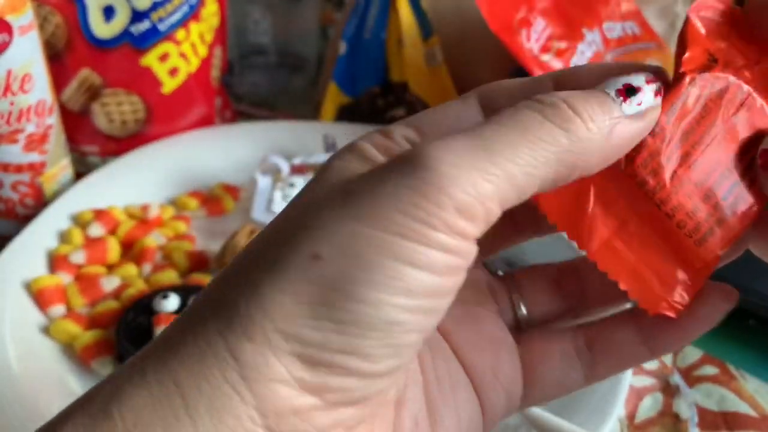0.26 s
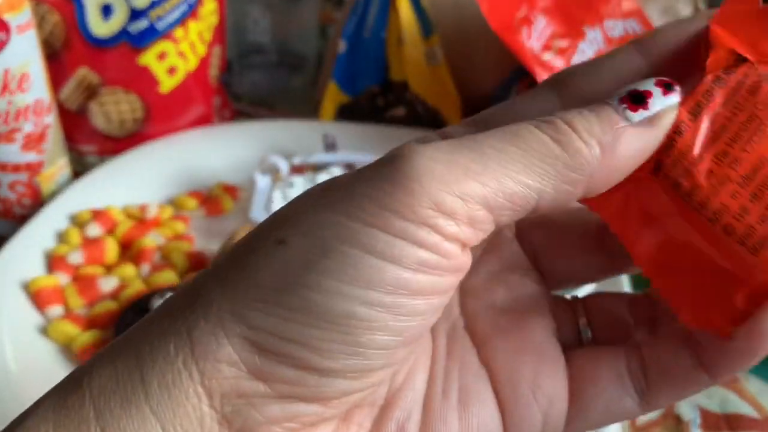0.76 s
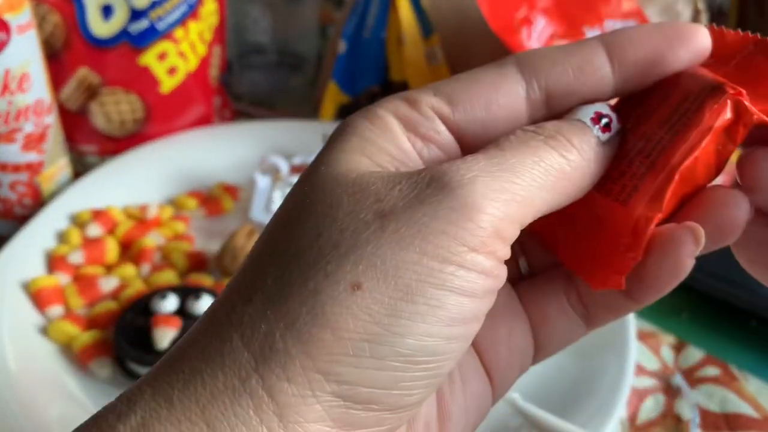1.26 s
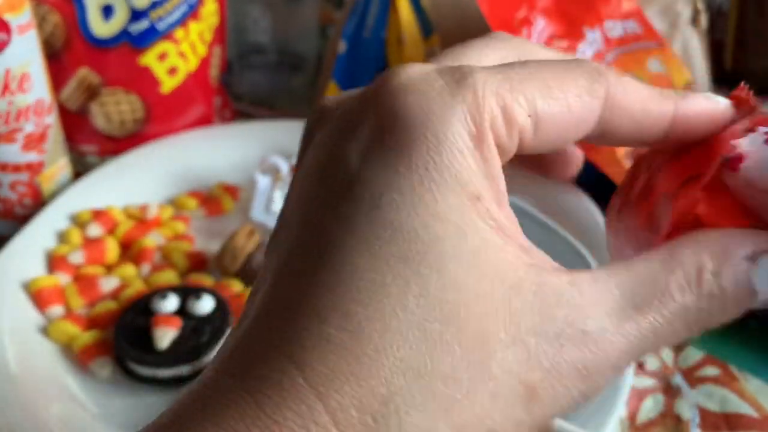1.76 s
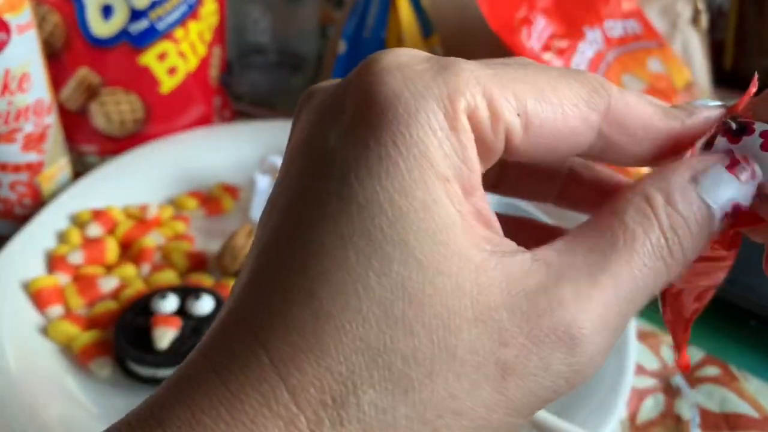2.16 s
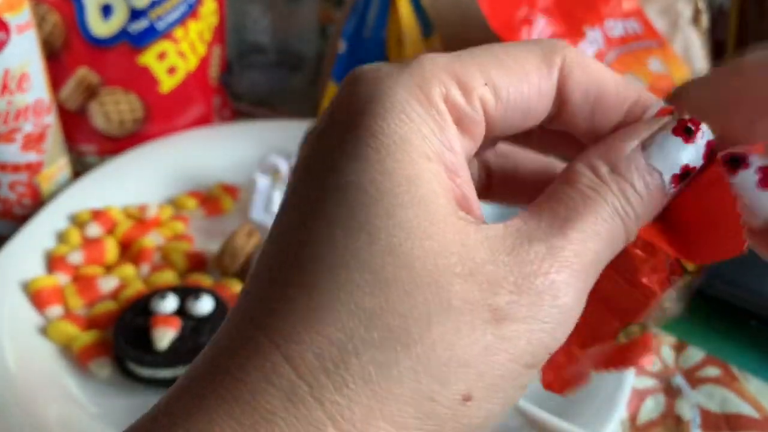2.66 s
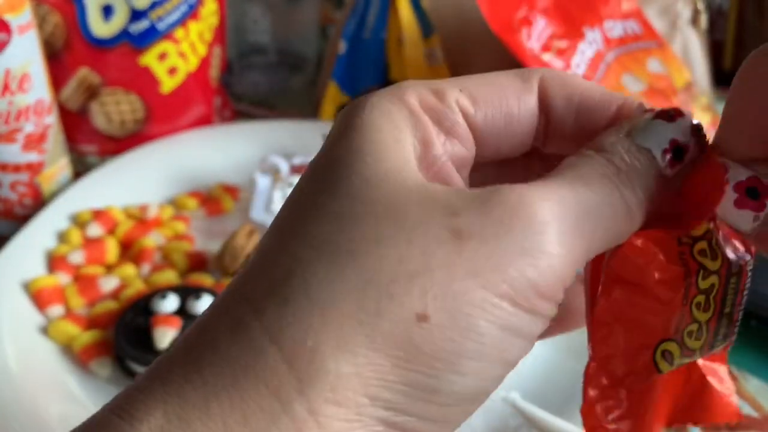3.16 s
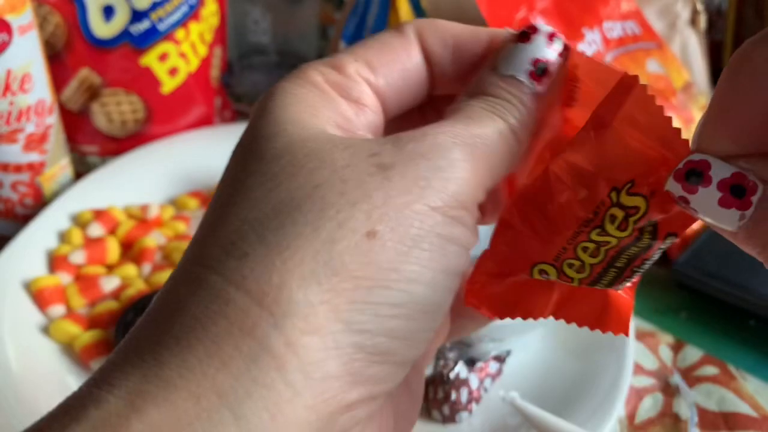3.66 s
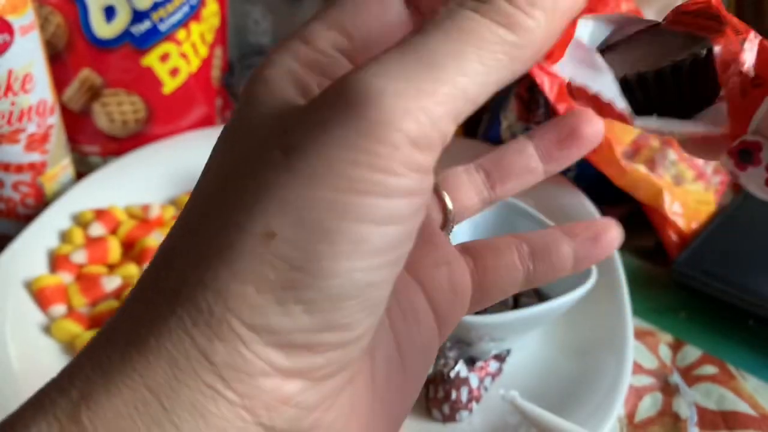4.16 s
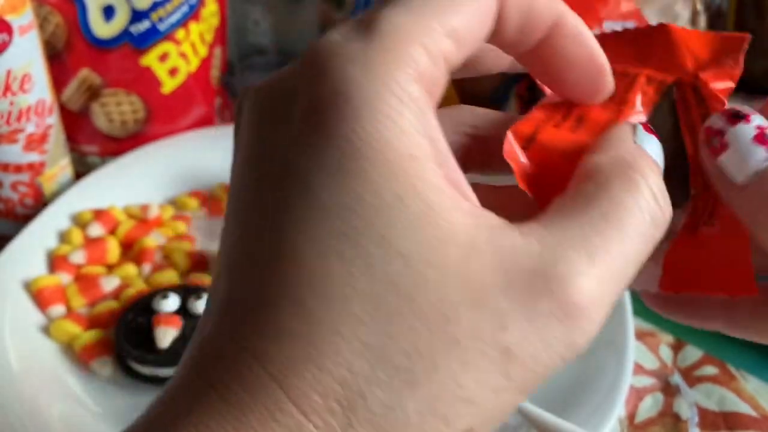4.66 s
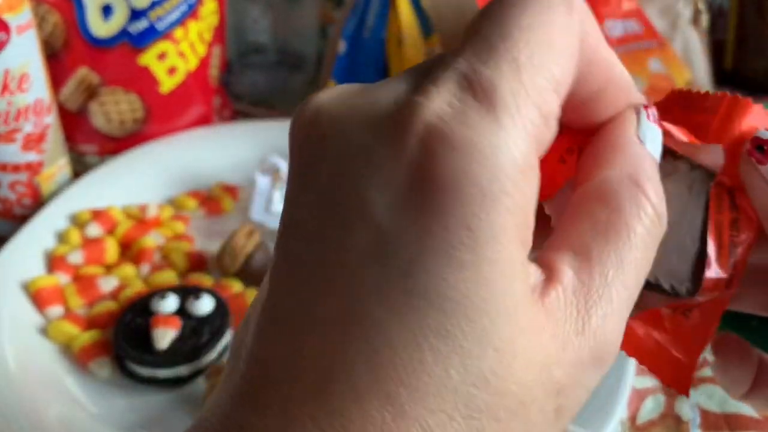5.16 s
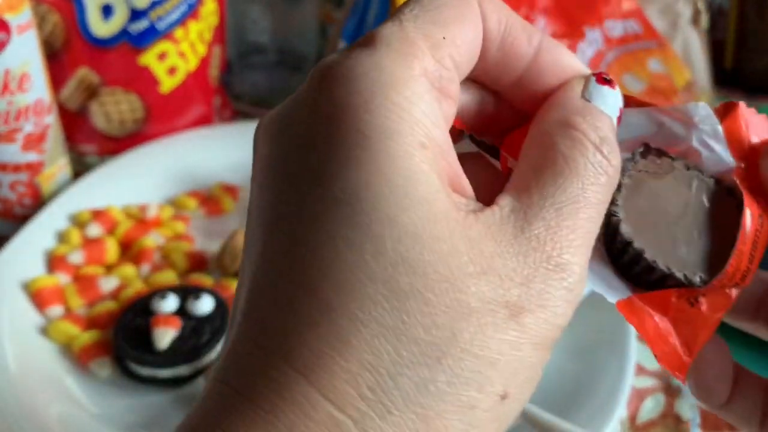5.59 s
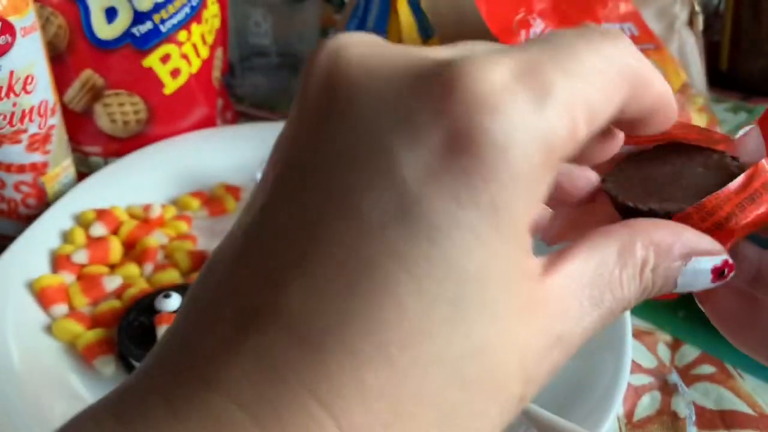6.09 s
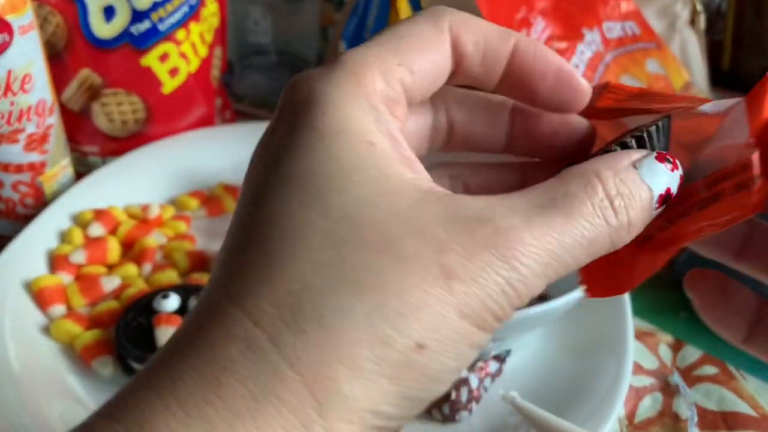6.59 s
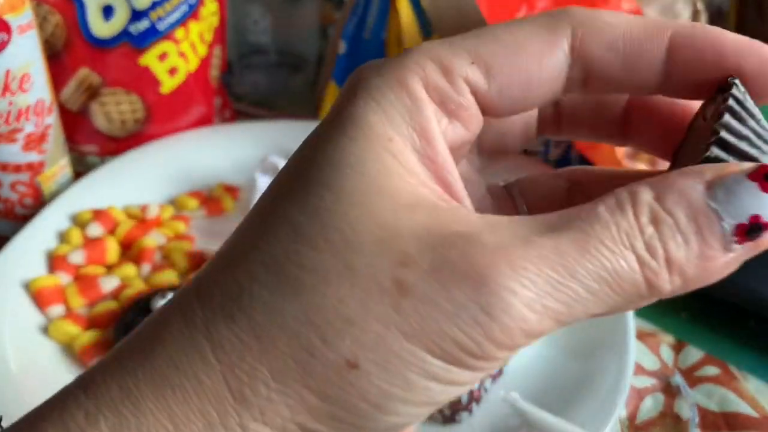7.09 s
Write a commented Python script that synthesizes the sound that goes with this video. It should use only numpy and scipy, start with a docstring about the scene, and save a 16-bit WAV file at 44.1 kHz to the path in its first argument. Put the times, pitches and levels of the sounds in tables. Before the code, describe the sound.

A dry, close stereo phone pickup of hands unwrapping a chocolate candy indoors. Thin film hisses and ticks under sliding fingers, creases crack sharply, and small panels pop with hollow knocks. Activity comes in uneven strokes with brief quiet gaps, peaking at the tear and again as the wrapper is peeled away. The pleated paper cup then rubs out dully over faint room rumble.

```python
"""Fingers turn, pinch and tear a small plastic candy wrapper close to a phone in a quiet room.
Room air and low rumble are filtered noise; from the start, creases snap as noise bursts with short rings.
Between snaps, skin slides over the film: flickering noise, with clicks, small ticks and panels that pop.
Late on, the paper cup of the candy slides out as a dull, grainy band of noise.
The hands are nearer the right microphone, so the treble reaches the left one a moment later."""
import sys
import numpy as np
from scipy import signal
from scipy.fft import rfft, irfft
from scipy.io import wavfile
from scipy.ndimage import uniform_filter1d

SR = 44100
rng = np.random.default_rng(int(sys.argv[2]) if len(sys.argv) > 2 else 0)


def unload_wav(signal):
    """Save mono or channel-first audio to the path in sys.argv[1] as 16-bit WAV at rate SR, clipped to [-1, 1]."""
    wavfile.write(
        sys.argv[1],
        SR,
        np.round(np.clip(np.atleast_2d(signal).T, -1, 1) * 32767).astype(np.int16),
    )


N = 323501

# tone colour of a bending fold: (frequency [Hz], relative level [dB per Hz])
FOLD_COLOUR = [(800, -31.5), (1400, -9), (2100, -3), (3300, -0.5), (5000, -17)]
# tone colour of a cracking crease: (frequency [Hz], relative level [dB per Hz])
CRACK_COLOUR = [(700, -21), (2000, -13.5), (5000, 2), (9000, 6), (15700, 8.5), (16100, -16), (17000, -41.5)]
# how the wrapper is held: (time [s], rustle at rest [dB], coarse share of the rustle [dB],
# hollow of the bag relative to the folds, before the hollow law [dB])
GRIP = [(0, -54.5, -6, -13), (.4, -62, -4, -13.5), (.8, -83.5, -6.5, -8), (1.27, -74, -4, -8.5),
        (1.6, -62, -4, -5.5), (2.2, -63.5, -1, -13), (2.6, -64.5, -7.5, -7), (2.87, -69.5, -0.5, -1.5),
        (3.3, -72.5, -15, 1.5), (3.7, -76.5, -5.5, -1.5), (4.27, -67.5, -3.5, 1), (4.55, -67, -17.5, 18),
        (4.8, -64, -7.5, -4.5), (5.4, -75, -13.5, -1), (5.7, -64, -2.5, 1.5), (6.3, -74.5, -11, 1.5),
        (6.5, -72, -7, 1.5), (6.85, -71.5, -19, -1.5), (7.0, -58.5, -1.5, -13), (7.2, -76, -5.5, 1)]


def gain_of(db):
    """Turns decibels into a gain."""
    return 10 ** (np.asarray(db) / 20)


def evened(x):
    """Scales a signal to an average strength (rms) of 1."""
    return x / np.sqrt(np.mean(x ** 2) + 1e-20)


def read(points, hz, axis=1):
    """Reads one column of a table at the given frequencies, along a log scale."""
    table = np.transpose(points)
    return np.interp(np.log(hz + 1), np.log(table[0] + 1), table[axis])


def curve(rows):
    """Draws each column of a table as a line over time, sample by sample."""
    s, *columns = np.transpose(rows)
    return [np.interp(np.arange(N) / SR, s, column) for column in columns]


def colour(x, points):
    """Filters sound to the given spectrum, with unit energy and nothing heard ahead of its cause."""
    level_db = np.maximum(read(points, np.fft.rfftfreq(8192, 1 / SR)), -90)
    log_gain = np.log(gain_of(level_db))
    both_sides = np.concatenate([log_gain, log_gain[-2:0:-1]])
    # the Hilbert transform supplies the phase that makes the filter respond as early as it can
    taps = np.fft.ifft(np.exp(np.conj(signal.hilbert(both_sides)))).real[:4096]
    return signal.oaconvolve(x, taps[None] / np.linalg.norm(taps), axes=1)[:, :N]


def flicker(seconds):
    """Makes a random wobble of rms 1 by smoothing noise over the given time."""
    size = max(round(seconds * SR), 2)
    smooth = uniform_filter1d(rng.standard_normal(N), size)
    return evened(uniform_filter1d(smooth, size))


def peaked(s, rise, fall):
    """Climbs straight to 1 at the given moment and sinks straight back, each in 5 ms or more."""
    return np.interp(np.arange(N) / SR, [s - max(rise, .005), s, s + max(fall, .005)], [0, 1, 0])


def ring(t, hz, t60, turns):
    """A sine that falls 60 dB in t60 seconds; each row starts at its own turn of the cycle."""
    return np.sin(2 * np.pi * (hz * t + turns[:, None])) * gain_of(-60 * t / t60)


def crackle(per_s, spread_db, t60, share):
    """Envelope of rms 1: an uneven hiss with tiny creases in it, a few far larger than the rest."""
    happens = rng.random(N) < per_s / SR
    size = gain_of(spread_db * np.minimum(rng.exponential(1, N), 3)) * happens
    decay = gain_of(-60 * np.arange(1500) / SR / t60)
    creases = evened(signal.oaconvolve(size, decay)[:N])
    return evened(gain_of(2.2 * flicker(0.015)) * (1 + share * creases))


def patchy(x, depth_db):
    """Random patches of the spectrum swell and fade, making the noise uneven."""
    z = signal.stft(x, nperseg=512, noverlap=384)[2]
    patches = rng.standard_normal(z.shape[1:])
    patches = uniform_filter1d(patches, size=3, axis=0)  # across frequency
    patches = evened(uniform_filter1d(patches, size=9, axis=1))  # across time
    # the second term keeps the mean power about the same
    swell_db = depth_db * patches - depth_db ** 2 * np.log(10) / 20
    return signal.istft(z * gain_of(swell_db), nperseg=512, noverlap=384)[1][:, :N]


def room():
    """Steady air of the room and a lumpy low rumble that swells as the phone is nudged in its holder."""
    # tone colour of the rumble: (frequency [Hz], relative level [dB per Hz])
    rumble_colour = [(15, -21.5), (30, -8.5), (55, 5), (100, -3.5), (200, -19), (400, -38)]
    # tone colour of the air: (frequency [Hz], relative level [dB per Hz])
    air_colour = [(20, -15), (50, -4), (160, 6.5), (300, -5), (600, -42), (1000, -47), (3000, -37.5),
                  (7000, -58.5), (15700, -5.5), (15900, -68.5)]
    # nudges: (time [s], added rumble [dB], half length [s])
    nudges = [(.26, -55, 0.068), (0.432, -58, 0.1), (0.927, -60, 0.1), (1.611, -55, 0.048),
              (1.947, -65, 0.094), (2.362, -53, 0.13), (2.634, -70, 0.12), (3.673, -66, .06),
              (3.98, -63, 0.076), (4.946, -71, 0.27), (5.226, -60, 0.08), (5.592, -68.5, 0.25),
              (5.925, -62, 0.098), (6.207, -67, 0.12), (6.665, -63, 0.062), (7.11, -74, 0.14)]
    air_db, rumble_db = -76, -74.5
    air, low = rng.standard_normal((2, 2, N))
    swells = sum(gain_of(db) * peaked(s, half, half) ** 2 for s, db, half in nudges)
    shake = (gain_of(rumble_db) + swells) * gain_of(2.9 * flicker(0.018))
    return gain_of(air_db) * colour(air, air_colour) + shake * colour(low, rumble_colour)


def cup():
    """Pleated paper rubs on the film as it slides out, with a dull, grainy band of its own."""
    # strength of the rub: (time [s], level [dB])
    slide = [(5.85, -88), (5.98, -72), (6.2, -60), (6.3, -81), (6.45, -55), (6.55, -63), (6.62, -58),
             (6.72, -75), (6.78, -87)]
    # tone colour of the paper: (frequency [Hz], relative level [dB per Hz])
    paper_colour = [(500, -38), (800, -1.5), (1050, 0), (1350, -5), (2200, -29.5)]
    rub = gain_of(curve(slide)[0]) * crackle(180, spread_db=6.0, t60=.012, share=.4)
    return colour(rng.standard_normal((2, N)) * rub, paper_colour)


def effort():
    """How hard the film is worked (gain) and how much the folds take part (dB)."""
    # pinches, slides and pulls: (firmest moment [s], rustle [dB], build-up [s], let-go [s],
    # folds relative to the rustle [dB])
    strokes = [(.018, -45.5, 0.03, 0.15, -13.5), (0.243, -46, 0.09, 0.071, -1),
               (.445, -43, 0.088, 0.91, -10), (.874, -55, 0.18, 0.045, 14), (1.116, -48, 0.097, 0.09, -7),
               (1.234, -50.5, 0.027, 0.0058, -11), (1.39, -38, 0.047, 0.093, -3),
               (1.575, -39.5, .11, 0.045, -6), (1.7, -45.5, 0.023, 0.096, -8.5),
               (1.894, -48, 0.056, 0.079, -14.5), (2.023, -42, 0.063, 0.015, -18),
               (2.125, -48, 0.025, 0.049, -10), (2.281, -43, 0.1, 0.14, -11.5),
               (2.45, -38.5, 0.044, 0.11, -5.5), (2.614, -51, 0.023, 0.17, -6),
               (3.02, -58, 0.011, 0.14, -4), (3.125, -56, 0.017, 0.36, -11.5),
               (3.283, -34.5, 0.045, 0.086, -11.5), (3.471, -42.5, 0.068, 0.2, -8.5),
               (3.666, -30, 0.081, 0.016, -1.5), (3.684, -45.5, .02, 0.095, -3),
               (3.851, -46, 0.12, 0.045, -10.5), (3.892, -36.5, 0.019, 0.2, -6.5),
               (4.171, -50.5, 0.091, 0.067, -4.5), (4.43, -48, 0.15, 0.049, -5.5),
               (4.55, -52.5, 0.23, 0.19, -23), (4.825, -47.5, 0.12, 0.23, -6.5),
               (4.999, -51, 0.057, 0.12, -9), (5.14, -55, 0.31, 0.21, -7),
               (5.22, -44.5, 0.033, 0.061, -10.5), (5.466, -43, 0.15, .07, -11.5),
               (5.593, -41.5, 0.042, 0.092, -6), (5.728, -34, 0.02, 0.049, -3.5),
               (5.79, -55.5, 0.067, 0.095, -1.5), (5.941, -44, 0.085, 0.04, -3.5),
               (6.0, -48.5, 0.066, 0.11, -7), (6.1, -44, 0.076, 0.085, -11),
               (6.208, -42.5, 0.071, 0.028, -4), (6.24, -57, 0.07, 0.6, -4),
               (6.436, -46, 0.016, 0.038, -10.5), (6.48, -80, 0.073, 0.036, 10),
               (6.605, -48.5, 0.061, 0.12, -2), (7.033, -48.5, 0.075, 0.12, -4.5)]
    rest_fold_db = -2.5  # a loose wrapper sounds through its folds
    rest = gain_of(curve(GRIP)[0])
    total, weighted_db = rest, rest * rest_fold_db
    for s, db, rise, fall, folds_db in strokes:
        stroke = gain_of(db) * peaked(s, rise, fall)
        total = total + stroke
        weighted_db = weighted_db + stroke * folds_db
    return total, weighted_db / total  # firmer strokes count for more in the size of the creases


def ticks(work):
    """Many small creases click by chance while the film is worked, each at one of 24 pitches."""
    per_s, level_db, spread_db, cycles = 350, -9, 4.5, 4
    happens = rng.random(N) < per_s / SR
    size = gain_of(spread_db * np.minimum(rng.exponential(1, N), 4)) * happens
    pitches = np.geomspace(1100, 12000, num=24)  # Hz
    facet = rng.integers(0, len(pitches), N)
    t, out = np.arange(800) / SR, np.zeros((2, N))
    for k, hz in enumerate(pitches):
        click = np.minimum(t * hz, 1) * ring(t, hz, cycles / hz + 0.001, rng.random(2))
        click = gain_of(2.0 * np.log2(hz / 4000)) * click  # 2 dB stronger per octave
        out += signal.oaconvolve((size * (facet == k))[None], click, axes=1)[:, :N]
    return gain_of(level_db) * work * evened(out)


def handling():
    """Skin slides over the film and creases it; small creases are bright, larger ones also shake the folds."""
    # tone colour of the fine rustle: (frequency [Hz], relative level [dB per Hz])
    fine_colour = [(6000, -30), (8000, 0), (12000, -1), (15700, -2), (15900, -70)]
    # tone colour of the coarse rustle: (frequency [Hz], relative level [dB per Hz])
    coarse_colour = [(2500, -27), (3800, -1), (7000, 2.5), (9000, -22.5)]
    # tone colour of the hollow bag: (frequency [Hz], relative level [dB per Hz])
    bag_colour = [(90, -26), (200, -17), (350, -6), (600, -12.5), (900, -2.5), (1200, -8.5), (2000, -28)]
    hollow_law = 0.6  # larger creases shake the hollow more than the folds
    work, fold_db = effort()
    coarse_db, hollow_db = curve(GRIP)[1:]
    bag_db = (1 + hollow_law) * fold_db + hollow_db
    coarse = gain_of(coarse_db)
    fine = np.sqrt(np.maximum(1 - coarse ** 2, .1))  # the rest of the rustle is fine
    small = work * crackle(900, spread_db=6, t60=0.004, share=0.4)
    large = small * crackle(90, spread_db=4.5, t60=0.012, share=0.3)
    layers = [(small * fine, 2.5, fine_colour),  # (strength, depth of the patches in dB, tone colour)
              (small * coarse, 3.5, coarse_colour),
              (large * gain_of(fold_db), 3.5, FOLD_COLOUR),
              (large * gain_of(bag_db), 3.5, bag_colour)]
    out = ticks(work)
    for drive, depth_db, points in layers:
        noise = rng.standard_normal((2, N))
        out = out + colour(patchy(noise, depth_db) * drive, points)
    return out


def flicks():
    """Creases too small to ring each give one short, wide tick of noise."""
    # tiny creases: (time [s], peak before the 4 dB lift and the tone colour [dB])
    tiny_creases = [(0.232, -23), (0.338, -36), (0.7098, -29.5), (1.3744, -33), (1.4765, -40),
                    (2.104, -36.5), (3.366, -44), (3.531, -30.5), (3.581, -30), (3.7763, -32),
                    (3.787, -29.5), (3.9072, -22.5), (3.9112, -20), (3.9193, -25), (4.43, -28),
                    (5.0765, -40), (5.1625, -31), (5.1685, -42), (5.256, -35.5), (5.3052, -38),
                    (5.4075, -27), (5.473, -35), (5.6403, -22), (5.7957, -41), (5.9978, -29.5),
                    (6.0507, -31), (6.431, -30), (7.0333, -27.5), (7.044, -33)]
    t60 = 0.0071  # s
    t, out = np.arange(600) / SR, np.zeros((2, N + 600))
    noises = rng.standard_normal((len(tiny_creases), 2, len(t)))
    for (s, db), noise in zip(tiny_creases, noises):
        at = round(s * SR)
        tick = noise * np.minimum(t / 0.00019, 1) * gain_of(-60 * t / t60)
        out[:, at:at + len(t)] += gain_of(db + 4) * tick / abs(tick).max()
    return colour(out, CRACK_COLOUR)


def pops():
    """A panel of the bag flips in or out in about one cycle and swings out, with a faint overtone."""
    # panels: (time [s], level before the 5 dB lift [dB], pitch [Hz], time to fall 60 dB [s])
    panels = [(0.2145, -37, 890, 0.0075), (0.254, -24, 284, 0.011), (0.876, -43, 735, 0.01),
              (1.4236, -43.5, 1220, 0.04), (1.7593, -36, 1070, 0.011), (2.1548, -33, 835, 0.0073),
              (2.266, -47.5, 840, 0.029), (2.518, -29.5, 1110, 0.012), (2.693, -51, 600, 0.014),
              (2.7357, -37, 736, 0.012), (3.0174, -35.5, 402, 0.011), (3.121, -44, 810, 0.026),
              (3.2701, -35.5, 457, 0.011), (3.3011, -14, 1280, 0.0024), (3.485, -42, 1145, 0.014),
              (3.6058, -22, 1240, 0.0099), (3.622, -30, 900, 0.0083), (3.6542, -17, 275, 0.021),
              (3.665, -35, 1190, 0.028), (3.9238, -40, 390, 0.018), (3.9329, -33.5, 890, 0.0072),
              (3.9543, -23, 247, 0.016), (3.9785, -34.5, 726, 0.014), (4.0022, -34, 747, 0.012),
              (4.182, -39, 950, 0.0088), (4.3114, -34.5, 710, 0.011), (4.436, -32.5, 348, 0.018),
              (4.532, -36, 1070, 0.0077), (4.624, -51, 776, 0.024), (4.745, -44.5, 797, 0.029),
              (4.9363, -45.5, 840, 0.026), (5.1684, -44, 810, 0.016), (5.201, -28.5, 980, 0.012),
              (5.213, -41.5, 940, 0.028), (5.3837, -46, 1110, 0.015), (5.4549, -42.5, 866, 0.02),
              (5.466, -42.5, 1120, 0.018), (5.602, -36, 835, 0.012), (5.6188, -20, 990, 0.0065),
              (5.7242, -14.5, 526, 0.011), (5.754, -40, 580, 0.046), (5.795, -31, 442, 0.013),
              (5.9041, -37, 455, 0.037), (5.948, -42, 1100, 0.02), (6.1345, -32, 867, 0.032),
              (6.192, -38, 686, 0.027), (6.1999, -34, 353, 0.021), (6.2135, -43, 805, 0.045),
              (6.279, -42.5, 1110, 0.014), (6.324, -44, 650, 0.031), (6.6172, -39, 997, 0.053),
              (6.6614, -27.5, 358, 0.012)]
    t, out = np.arange(3000) / SR, np.zeros((2, N + 3000))
    for (s, db, hz, t60), chance in zip(panels, rng.random((len(panels), 2))):
        at = round(s * SR)
        swing = ring(t, hz, t60, np.array([0, .25])) + 0.2 * ring(t, 1.8 * hz, t60, chance)
        flip = np.minimum(t * hz / 0.83, 1) ** 2
        out[:, at:at + len(t)] += gain_of(db + 5.0) * flip * swing
    # a panel this small radiates no deep bass
    return signal.sosfilt(signal.butter(2, 130, "highpass", fs=SR, output="sos"), out[:, :N])


def snaps():
    """Each buckling crease gives a hard crack with a short rattle; facet and fold beside it ring briefly."""
    # creases, levels before the lifts below: (time [s], crack level [dB], pitch of the facet [Hz],
    # fold relative to the crack [dB], pitch of the fold [Hz], time for the facet to fall 60 dB [s])
    creases = [(0.01, -24, 10200, -20, 4070, 0.008), (0.1317, -22, 4250, -6.5, 2090, 0.012),
               (0.2138, -16.5, 6930, -20, 1940, 0.01), (0.251, -18.5, 4600, -13, 1530, 0.0087),
               (0.2789, -11, 14300, -34, 2170, 0.01), (0.469, -22, 10100, -8.5, 3280, 0.011),
               (0.4744, -28.5, 3970, -3.5, 4070, 0.008), (0.5054, -24, 10700, -16.5, 4000, 0.007),
               (0.5424, -29, 10700, -7.5, 3780, 0.02), (0.5672, -5.5, 11650, -28.5, 2800, 0.0046),
               (0.6017, -22.5, 10300, -18, 3100, 0.0039), (0.7034, -18.5, 3770, -20, 3560, 0.0077),
               (0.741, -30, 10370, -10, 2130, 0.0068), (0.8116, -19.5, 7260, -16, 4040, 0.0088),
               (0.8412, -2, 4620, -29, 3870, 0.0069), (0.8841, -13, 14700, -24.5, 2820, 0.022),
               (0.8915, -24, 6500, -12.5, 2200, 0.0099), (0.929, -20, 12800, -45, 3800, 0.0097),
               (0.9527, -35, 11300, -31, 2030, 0.0029), (1.3655, -33, 15400, -18, 2260, 0.0067),
               (1.4276, -16, 6100, -16.5, 1440, 0.0054), (1.4438, -17, 7900, -14.5, 3200, 0.012),
               (1.497, -29, 14300, -35, 2260, 0.012), (1.5588, -21.5, 10700, -33, 2900, 0.01),
               (1.6927, -5, 7340, -28.5, 2030, 0.0064), (1.7593, -25, 6200, -10, 1780, 0.011),
               (2.141, -23, 7080, -36, 4060, 0.0069), (2.152, -25, 3620, -4.5, 3740, 0.0051),
               (2.236, -22, 7200, -27, 3800, 0.007), (2.256, -18, 7060, -27, 3800, 0.0041),
               (2.288, -9.5, 6240, -20, 3470, 0.012), (2.4536, -18.5, 11100, -20, 3700, 0.0085),
               (2.4624, -18, 11100, -16.5, 3830, 0.0057), (2.481, -23.5, 10200, -18, 3750, 0.0043),
               (2.4937, -3.5, 9730, -24.5, 3780, 0.0045), (2.5037, -19, 3900, -19, 2130, 0.011),
               (2.5124, -29.5, 6200, 1.5, 2090, 0.0086), (2.7352, -35.5, 4200, -8, 2040, 0.012),
               (3.017, -24, 15200, -20.5, 1390, 0.019), (3.0721, -30, 11650, -31, 1480, 0.008),
               (3.121, -23.5, 6680, -16, 2400, 0.0058), (3.1448, -29, 10600, -19, 2130, 0.013),
               (3.2067, -30.5, 11000, -25, 2440, 0.015), (3.2698, -21, 10700, -14, 1980, 0.0082),
               (3.2816, -6, 14600, -27, 2470, 0.0044), (3.3008, -13, 15000, -14, 2600, 0.014),
               (3.3112, -17.5, 14700, -26, 1030, 0.0097), (3.3207, -18.5, 10800, -36, 1100, 0.0083),
               (3.35, -29, 11900, -39, 2080, 0.007), (3.4095, -21, 9800, -27, 1470, 0.0086),
               (3.458, -31.5, 10900, -36, 1500, 0.023), (3.4645, -32, 15600, -40, 1880, 0.017),
               (3.4836, -13.5, 15100, -22.5, 1170, 0.0055), (3.5227, -23.5, 10600, -21.5, 2040, 0.012),
               (3.6057, -6, 12970, -17, 1910, 0.0091), (3.6366, -9.5, 6640, -38.5, 1130, 0.0078),
               (3.6512, -11.5, 10200, -16, 1170, 0.0088), (3.6639, -7, 9300, -31, 1130, 0.011),
               (3.7586, -35, 6000, -17, 2310, 0.0094), (3.876, -15.5, 4600, -11, 1810, 0.011),
               (3.8819, -9, 10900, -13, 2920, 0.0043), (3.8973, -15.5, 11300, -32, 3920, 0.0096),
               (3.929, -15.5, 10900, -18, 4000, 0.0043), (3.934, -9.5, 4750, -36, 3630, 0.0041),
               (3.9535, -10, 10700, -22, 1130, 0.0067), (3.981, -35, 10600, -5, 2120, 0.0078),
               (3.993, -14.5, 10000, -11.5, 2910, 0.0047), (4.0013, -19, 10400, -15.5, 2980, 0.0081),
               (4.1614, -31, 14800, -14, 3650, 0.007), (4.172, -24, 15000, -26, 1100, 0.0071),
               (4.1805, -24, 4450, -15, 3520, 0.0036), (4.311, -31.5, 10200, -7.5, 930, 0.0093),
               (4.352, -37, 4500, -9, 1090, 0.012), (4.3803, -27.5, 9900, -32, 1010, 0.008),
               (4.4082, -31, 10300, -34, 1130, 0.0084), (4.4256, -21.5, 10800, -23, 1000, 0.011),
               (4.437, -10.5, 10000, -23.5, 2130, 0.004), (4.4453, -27, 10500, -19, 2090, 0.0064),
               (4.4852, -30.5, 12100, -24, 2060, 0.016), (4.5308, -24, 11400, -21.5, 1190, 0.012),
               (4.7283, -32.5, 10000, -16, 1030, 0.009), (4.7437, -21, 12500, -16.5, 3500, 0.0091),
               (4.77, -27.5, 4900, -13.5, 1820, 0.013), (4.817, -21, 9800, -17, 2160, 0.005),
               (4.8874, -32, 10000, -9, 3800, 0.007), (4.9033, -33, 11200, -10, 2170, 0.015),
               (4.925, -23, 10800, -17.5, 1780, 0.011), (4.9364, -9.5, 10730, -18.5, 3870, 0.0077),
               (4.9923, -23, 13000, -38, 2010, 0.017), (4.9983, -17, 11660, -25, 2030, 0.0078),
               (5.019, -26, 10000, -19, 1020, 0.007), (5.123, -48.5, 15300, 2, 1110, 0.0079),
               (5.1995, -11.5, 10870, -17, 1630, 0.0093), (5.2098, -24, 11000, -14, 3680, 0.0078),
               (5.214, -22.5, 3670, -49, 3720, 0.009), (5.288, -37, 10100, -26, 1520, 0.022),
               (5.3123, -18.5, 10570, -32, 1380, 0.0076), (5.355, -36, 10600, -32, 3960, 0.01),
               (5.3841, -23.5, 10800, -16.5, 1200, 0.0079), (5.3954, -30, 9500, -30, 1040, 0.0093),
               (5.414, -10.5, 9500, -27, 2030, 0.0081), (5.456, -25, 10200, -18.5, 1090, 0.0093),
               (5.58, -22, 3800, -10.5, 2770, 0.01), (5.5941, -19, 6240, -12.5, 1850, 0.01),
               (5.602, -21, 14500, -12.5, 2120, 0.011), (5.6188, -27, 7000, -4, 1030, 0.011),
               (5.626, -20, 10700, -30.5, 2250, 0.0096), (5.645, -37.5, 15100, -1.5, 2210, 0.0095),
               (5.7171, -9, 6450, -11.5, 3920, 0.0059), (5.7248, -10, 14100, -10.5, 1600, 0.0075),
               (5.764, -34, 3900, -8.5, 1840, 0.0051), (5.8267, -50.5, 10300, 8.5, 2000, 0.0056),
               (5.874, -12.5, 9800, -12, 3750, 0.0074), (5.901, -29, 15500, -10, 2120, 0.0052),
               (5.9219, -8, 10570, -18, 3800, 0.01), (5.9379, -11.5, 6330, -28, 1110, 0.0079),
               (5.9457, -6, 14400, -28.5, 1090, 0.0076), (6.0335, -25.5, 11500, -20, 960, 0.0097),
               (6.0371, -19, 9800, -21, 3770, 0.0079), (6.084, -26, 10400, -9.5, 3900, 0.0071),
               (6.0983, -10, 10420, -23, 3780, 0.0099), (6.134, -17, 3580, -10, 970, 0.0071),
               (6.1654, -21.5, 6550, -29, 2830, 0.009), (6.171, -20.5, 10100, -18, 3670, 0.0061),
               (6.193, -32, 3780, -10, 2200, 0.0099), (6.2052, -14.5, 11670, -31, 2200, 0.013),
               (6.2452, -30.5, 11100, -24, 1030, 0.012), (6.285, -36, 15400, -17, 1460, 0.0068),
               (6.311, -24.5, 9600, -18, 4170, 0.0059), (6.3219, -25, 11900, -26.5, 1130, 0.0066),
               (6.421, -30.5, 12600, -18, 1070, 0.0078), (6.549, -29.5, 6770, -28, 1000, 0.0064),
               (6.616, -20.5, 9800, -14, 935, 0.013), (6.66, -25.5, 15160, -13, 1630, 0.0016),
               (6.9945, -31, 6550, -10, 3420, 0.011), (7.014, -24.5, 5870, -24, 3600, 0.0067),
               (7.0819, -28.5, 6150, -13.5, 2000, 0.0083), (7.2387, -50, 4440, 4.5, 1875, 0.028)]
    t = np.arange(1500) / SR
    crack, dull, rings = np.zeros((3, 2, N + len(t)))
    noises = rng.standard_normal((len(creases), 2, 2, len(t)))
    chances = rng.random((len(creases), 4, 2))
    rise = np.minimum(t / 0.00035, 1) ** 2
    for (s, db, hz, fold_db, fold_hz, t60), noise, chance in zip(creases, noises, chances):
        at, t60 = round(s * SR), np.clip(t60, .002, .05)
        here = slice(at, at + len(t))
        rattle = gain_of(-8 - 60 * t / (2.2 * t60))
        shape = rise * (gain_of(-60 * t / 0.0028) + rattle)
        burst = noise[0] * shape
        crack[:, here] += gain_of(db + 2.0) * burst / abs(burst).max()
        dull[:, here] += gain_of(db + fold_db + 4.5) * noise[1] * shape
        # a neighbouring facet of chance size answers more faintly
        neighbour_hz = hz * (0.606 + .5 * chance[1, 0])
        facet = ring(t, hz, t60, chance[0]) + 0.84 * ring(t, neighbour_hz, t60, chance[2])
        fold = np.minimum(t / 0.00079, 1) * ring(t, fold_hz, .007, chance[3])
        rings[:, here] += gain_of(db - 2.0) * rise * facet
        rings[:, here] += gain_of(db + fold_db + 12.0) * fold
    thin = signal.butter(2, 700, "highpass", fs=SR, output="sos")
    together = colour(crack, CRACK_COLOUR) + colour(dull, FOLD_COLOUR) + rings[:, :N]
    return signal.sosfilt(thin, together)


def scene():
    """The right microphone hears the shared part; the left mixes in a part of its own and hears it later."""
    # the two microphones: (frequency [Hz], left-right likeness [0 to 1], left minus right [dB],
    # share of the full delay [0 to 1])
    ports = [(60, 0.96, 0, 0.24), (300, 0.97, 0.5, 0.45), (1012, 0.74, -0.5, 0.26), (2160, 0.85, 1, 0.18),
             (2460, .5, 0, 1), (3200, 0.7, 0, 0.97), (4300, 0.13, -4.5, 1), (5800, 0.033, -1, 0.71),
             (6700, 0.82, -0.5, 0.93), (9400, 1, 0, 0.98), (15800, 0.9, 0, 1)]
    left_delay_s = 8.12 / SR  # full delay
    # every source makes two rows: the shared part and the left microphone's own part
    shared, own = rfft(room() + cup() + handling() + flicks() + pops() + snaps(), axis=1)
    hz = np.fft.rfftfreq(N, 1 / SR)
    same = np.clip(read(ports, hz), 0, 1)
    tilt = gain_of(read(ports, hz, axis=2) / 2)
    share = np.clip(read(ports, hz, axis=3), 0, 1)
    delay = np.exp(-2j * np.pi * hz * left_delay_s * share)
    left = (same * shared + np.sqrt(1 - same ** 2) * own) * delay
    return irfft(np.array([left * tilt, shared / tilt]), N, axis=1)


def record(dry):
    """The loudest peaks saturate softly; then a low-pass at 16.7 kHz cuts the highest treble."""
    headroom, edge_hz = .9, 16700
    soft = headroom * np.tanh(dry / headroom)
    lowpass = signal.firwin(511, edge_hz, window=("kaiser", 9), fs=SR)
    return signal.oaconvolve(soft, lowpass[None], "same")


dry = scene()
out = record(dry)
unload_wav(out)
```